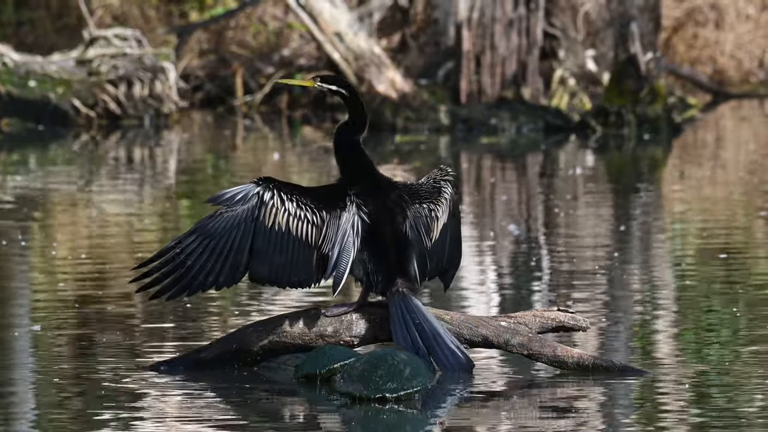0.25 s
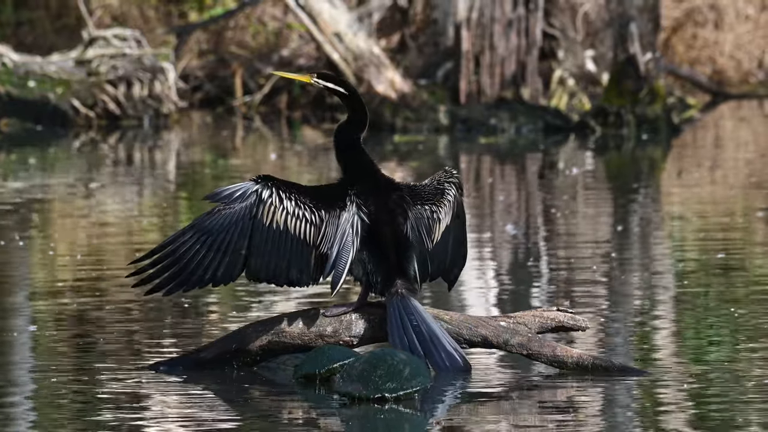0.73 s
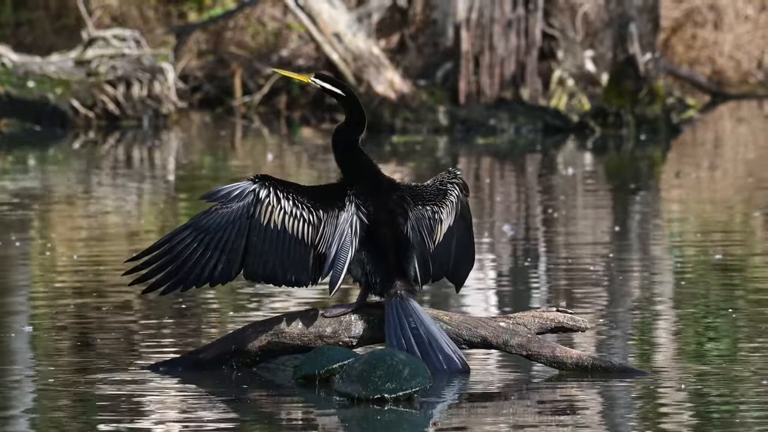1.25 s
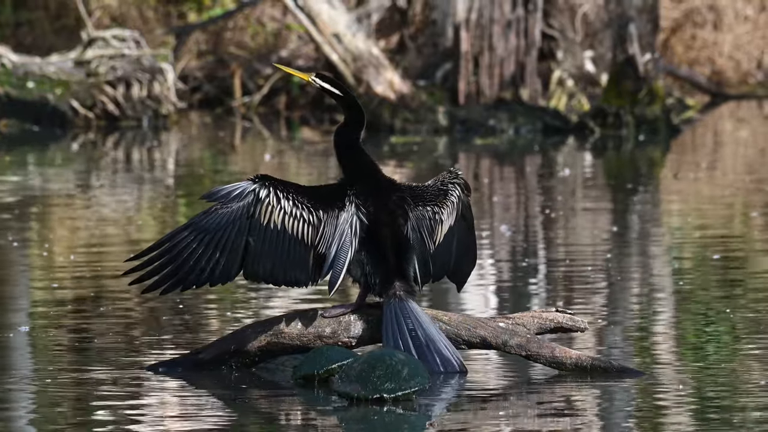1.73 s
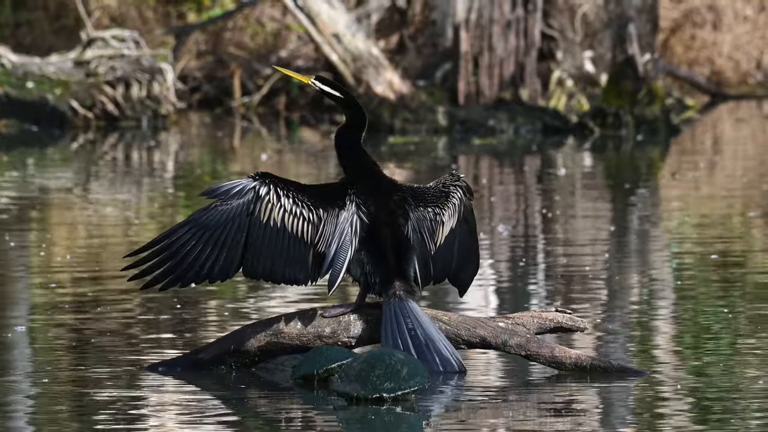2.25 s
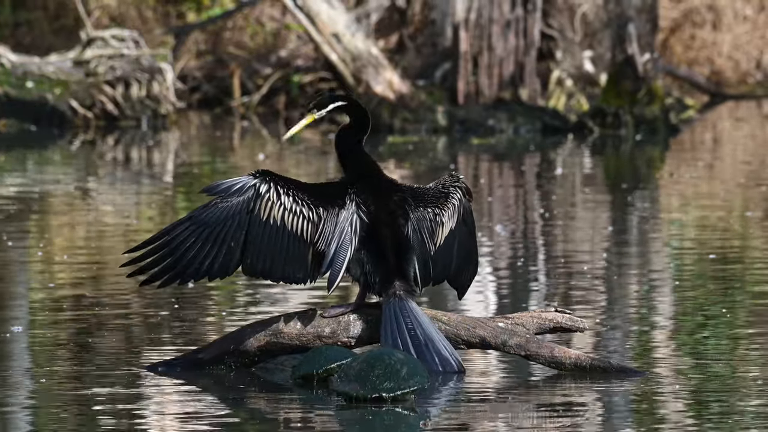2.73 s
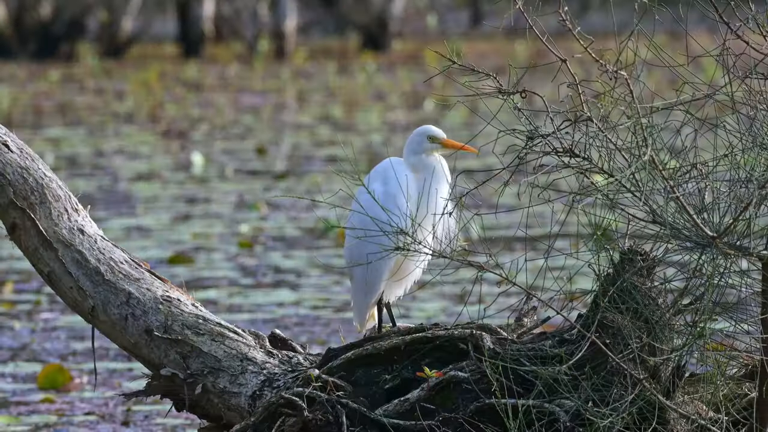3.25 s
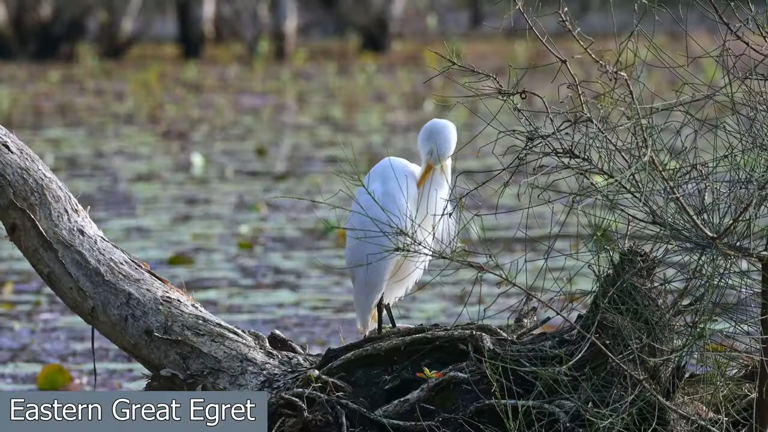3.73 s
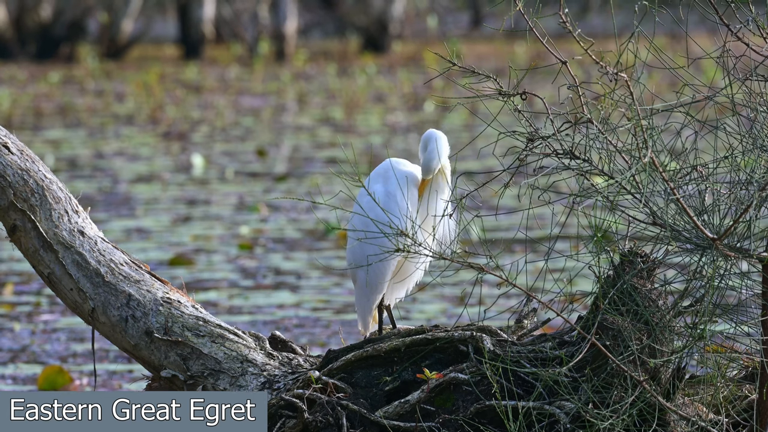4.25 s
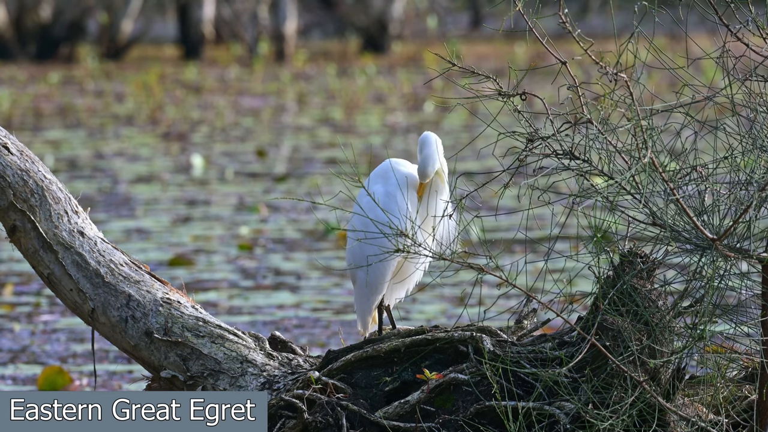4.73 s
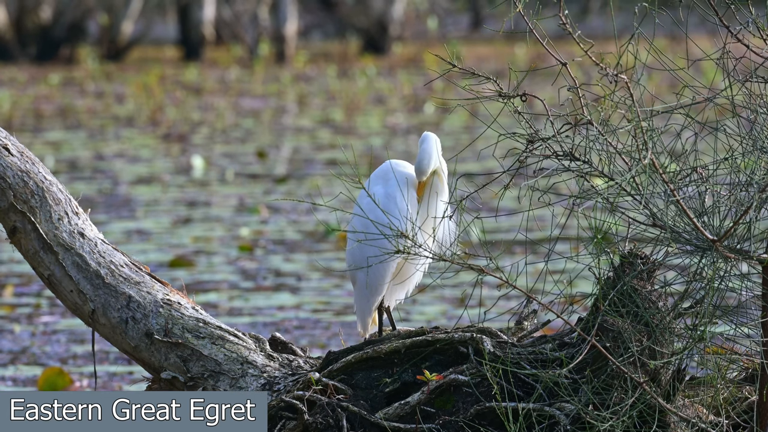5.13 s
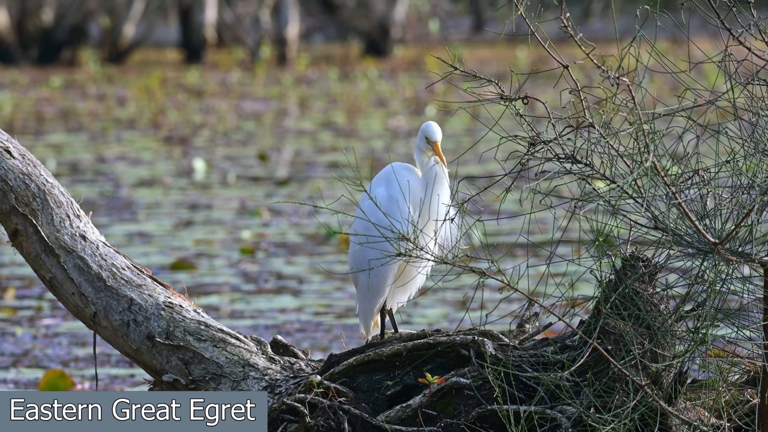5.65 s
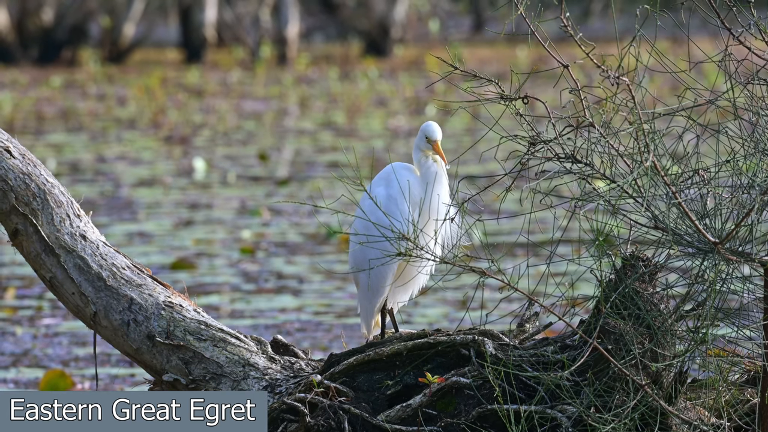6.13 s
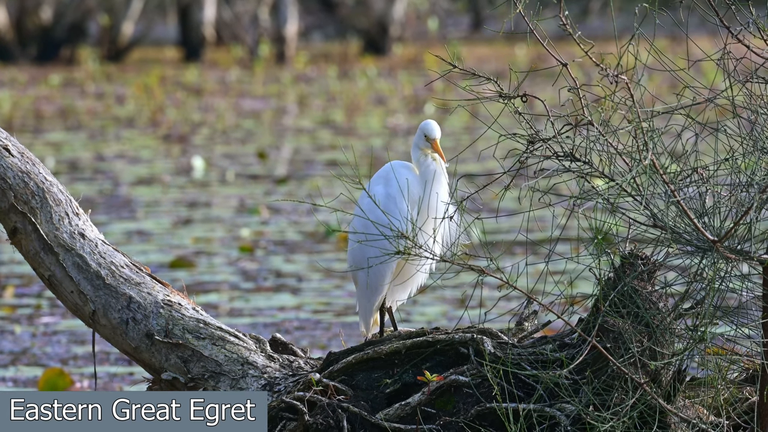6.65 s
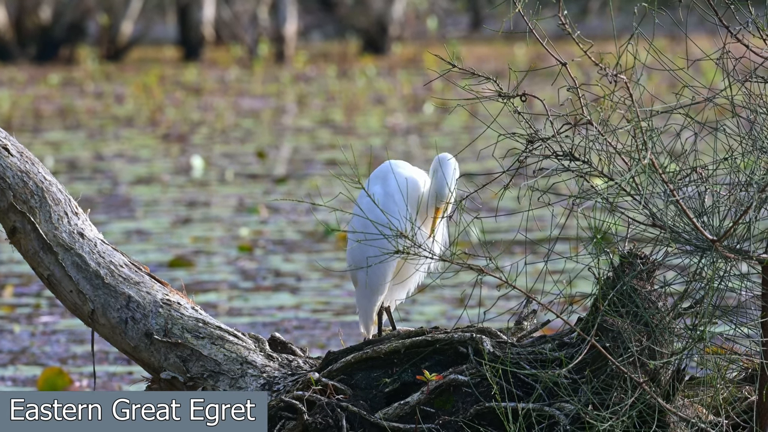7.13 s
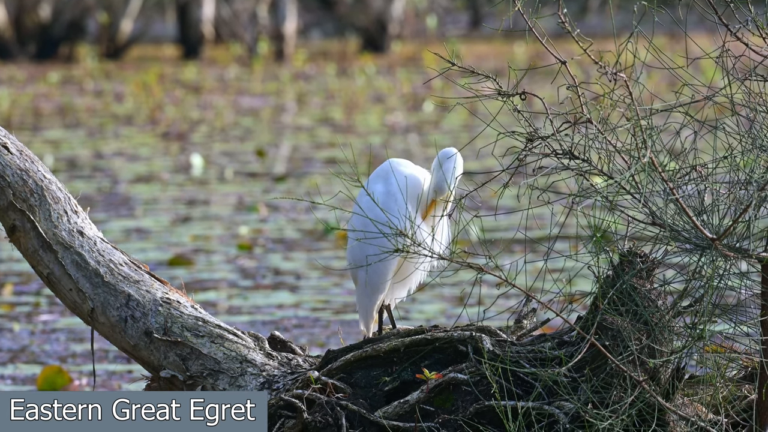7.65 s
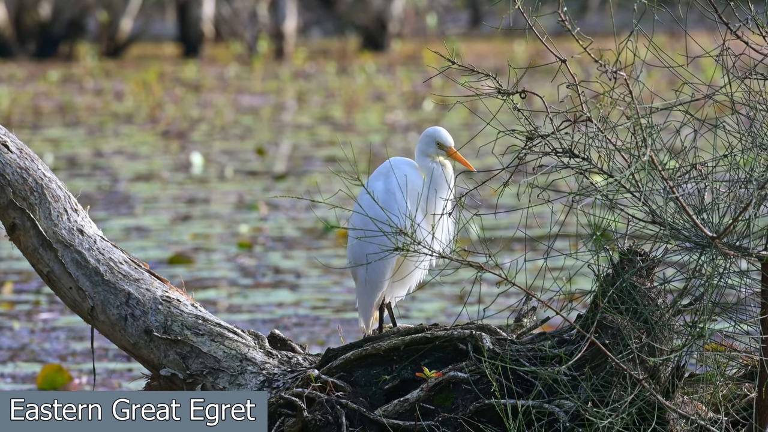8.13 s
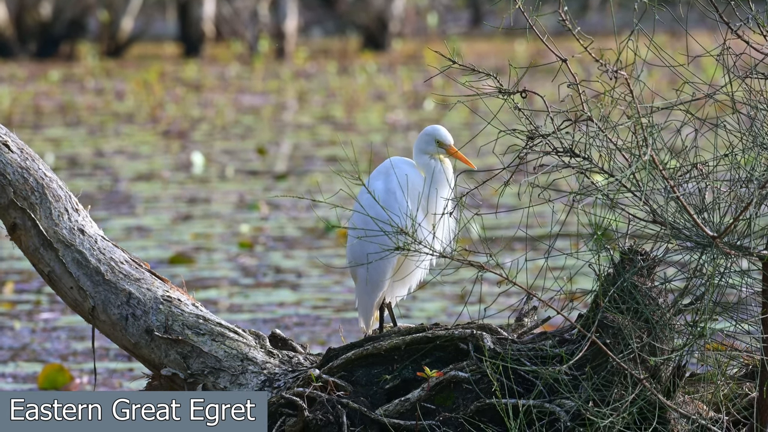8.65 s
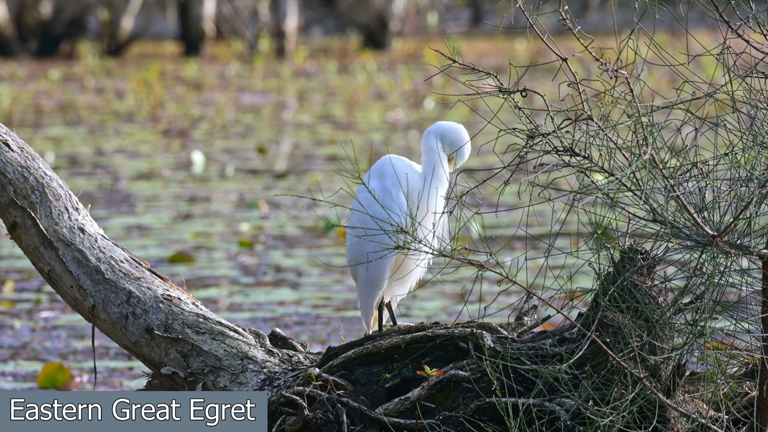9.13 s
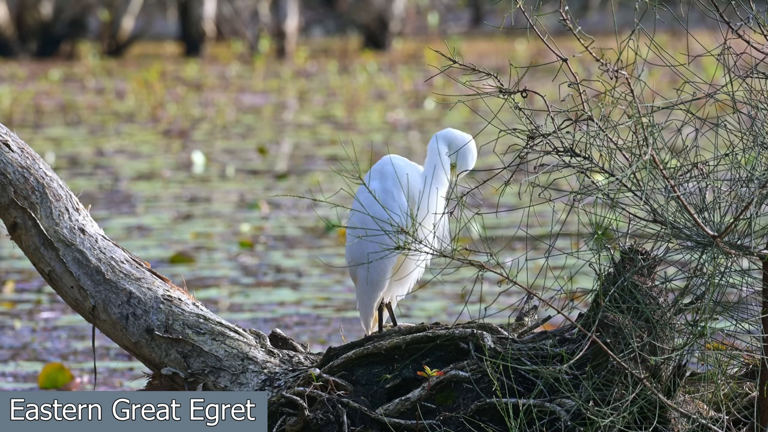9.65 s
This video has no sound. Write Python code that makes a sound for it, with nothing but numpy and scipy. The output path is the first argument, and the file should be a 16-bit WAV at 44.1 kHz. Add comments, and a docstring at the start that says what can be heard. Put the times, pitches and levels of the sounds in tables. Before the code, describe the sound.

A wooded wetland alive with small birds, heard in stereo with a short, soft echo from trees. From 0 to 1 second, raspy, scratchy calls mix with high whistles over a dense, blurred distant chorus and a low far rumble with faint hiss. A short buzzing note comes at about 1.2, bright bent whistles at 1.4, and brief throaty croaks near 1.5 and 2.7. Between 2.8 and 3.2 the rumble sinks to a much quieter bed. Quick squeaks, chirps and a fluted warble cluster at 3.1-3.9, then lively bursts at 4.2-4.7, 5.3, 5.8 and 6.2-6.6, with quieter gaps. Busy chirping resumes at 7-7.5; a fast, dry trill of about fourteen syllables per second runs from 7.5 to 9.1, weakening toward its end, with sharp whistles over it around 8-8.5. A low warble and faint rasp arrive near 9.1, then scattered thin whistles until 9.9.

```python
"""A wetland wood full of small birds. Close by are whistled notes with overtones, low fluted warbles,
a dry trill, steep squeaks, a buzz, rasps and two croaks. The whistles are gliding sines with overtones;
rasps and croaks are pulses ringing a throat. Behind them a chorus of many short glides is blurred
toward noise. Far rumble and hiss, made of coloured noise, sink after about three seconds."""
import sys
import numpy as np
from scipy import signal
from scipy.fft import rfft, irfft
from scipy.io import wavfile
from scipy.ndimage import uniform_filter1d

SR = 44100
rng = np.random.default_rng(int(sys.argv[2]) if len(sys.argv) > 2 else 0)


def persist_wave(psi):
    """Save psi, clipped to +-1, as 16-bit WAV."""
    counts = np.round(np.clip(psi, -1, 1) * 32767).astype(np.int16)
    wavfile.write(sys.argv[1], SR, np.atleast_2d(counts).T)


N = 435708   # length in samples

# Colour of the far rumble and hiss, early and late. Each row: frequency in Hz, relative dB per Hz.
EARLY_COLOUR = [(12, -36), (20, -11.5), (77, 2.5), (157, 1.5), (483, -8.5), (899, -7), (1140, -17.5),
                (1340, -11), (1610, -20.5), (2400, -27), (3120, -71), (5280, -120)]
LATE_COLOUR = [(12, -37), (20, -13), (75, -0.5), (255, -2), (330, -9.5), (396, -11), (693, -17),
               (782, -17.5), (1890, -25.5), (2400, -24.5), (3120, -52), (5280, -120)]
EARLY_DB, LATE_DB = -45.5, -58   # rms below 1 kHz
# Start and end, in seconds, of the fade from the early to the late background.
FADE_S = [2.8, 3.18]
# How alike the far noise is in both ears. Each row: frequency in Hz, likeness from 0 to 1.
EAR_LIKENESS = [(60, 1), (290, 0.97), (640, 0.81), (1410, 0.52), (3100, 0.12)]

# Swells of the blurred chorus. Each row: middle in seconds, half length in seconds,
# then the levels of low voices, high voices and overtones in dB.
CHORUS_SWELLS = [(0.0, 0.29, -38.5, -47.5, -86), (0.382, 0.22, -41.5, -47.5, -75),
                 (0.797, 0.2, -44, -52.5, -88), (1.455, 0.31, -42, -56.5, -87),
                 (1.725, 0.16, -50, -59, -84), (2.09, 0.22, -47, -66, -89), (2.517, 0.42, -53, -75, -92),
                 (2.78, 0.26, -46.5, -59.5, -86), (3.403, .15, -49.5, -47, -61.5),
                 (3.644, 0.086, -68, -57, -61), (3.8, 0.14, -60.5, -75, -87), (4.388, 0.18, -52, -68, -87),
                 (4.53, 0.17, -75, -66, -79), (4.975, 0.15, -56.5, -58.5, -75), (5.31, 0.15, -57, -66, -85),
                 (5.822, 0.12, -58, -53, -70.5), (6.278, 0.14, -55, -69, -71), (6.446, 0.18, -51, -53, -65),
                 (6.672, 0.22, -58, -49, -68.5), (7.02, 0.24, -54, -80, -84),
                 (7.197, 0.12, -56, -52.5, -74), (7.412, 0.18, -52, -69, -68), (7.99, 0.098, -53, -67, -71),
                 (8.368, 0.18, -45, -56, -63.5), (8.753, 0.36, -55, -72, -101.5),
                 (8.904, 0.13, -54, -50, -65.5), (9.16, .1, -47, -61, -64), (9.258, .11, -50.5, -52, -60),
                 (9.655, 0.043, -64, -51, -85), (9.88, 0.15, -49, -58, -68)]
# Steady murmur between swells, first row early, second late. Each row: low voices, high voices
# and overtones in dB.
MURMUR_LEVELS = [(-55.5, -81, -80), (-58.5, -65.5, -91)]
WOOD_T60_S, WOOD_DB, LEAF_CUT_HZ = 0.37, -10, 6500   # echo decay, echo level for near birds, dulling

# Croaks. Each row: start in seconds, length in seconds, level in dB before shaping and end fades.
CROAK_CALLS = [(1.476, .185, -37.5), (2.669, .17, -40.5)]
# Course of one croak. Each row: share of its length, pulses per second before drift, dB added.
CROAK_COURSE = [(0, 302., -1.5), (0.202, 312., -4.5), (.5, 308., -1), (0.752, 294., 0.5), (1, 272., -10)]
# Resonances of the croaking throat, for one of two passes. Each row: Hz, width in Hz, level in dB.
CROAK_THROAT = [(1450, 410, -3), (2500, 180, -21)]

# Rasping calls. Each row: start in seconds, end in seconds, pulses per second before drift,
# level in dB before end fades, depth of chopping from 0 to 1.
RASP_CALLS = [(0.045, 0.227, 64, -58, 0.22), (0.262, 0.522, 75., -52.5, 0.1),
              (0.648, 0.901, 70., -54.5, 0.5), (9.129, 9.31, 92, -61, 0.3)]
# Resonances of the rasping throat. Each row: frequency in Hz, width in Hz, level in dB.
RASP_RESONANCES = [(3900, 650, -7), (4860, 4000, -5), (6980, 150, -11), (2800, 600, 12)]

# Trill. Each row: onset in seconds, dB added to the syllable.
TRILL_SYLLABLES = [(7.5468, -34), (7.6294, -33), (7.7021, -32), (7.7746, -32.5), (7.8463, -32),
                   (7.9174, -34), (7.992, -34.5), (8.063, -34.5), (8.1336, -33.5), (8.2035, -35.5),
                   (8.2748, -31.5), (8.3516, -38), (8.424, -34.5), (8.4987, -33.5), (8.5738, -34),
                   (8.65, -36), (8.733, -35.5), (8.815, -44.5), (8.885, -45), (8.958, -50), (9.03, -49),
                   (9.1, -48)]
# One trill syllable. Each row: seconds after onset, pitch in Hz, relative dB.
SYLLABLE_SHAPE = [(-.009, 2748, -34), (-.003, 3208, -14.5), (.004, 3290, -10), (.009, 2700, -12),
                  (.016, 2262, -11.5)]

# Steep squeaks. Each row: time of the highest pitch in seconds, dB added to the arch.
SQUEAK_TOPS = [(2.107, -57.5), (3.054, -66.5), (3.165, -64.5), (3.291, -60), (3.462, -61.5), (3.645, -63.5),
               (3.84, -78), (4.08, -72.5), (4.429, -62), (4.699, -70), (5.277, -73), (7.373, -74),
               (8.01, -64.5), (8.268, -58), (9.656, -73)]
# Rise and fall of one squeak. Each row: seconds from the top, pitch in Hz before scaling, relative dB.
SQUEAK_ARCH = [(-.025, 2180, -44), (-.012, 2945, 8), (-.003, 3900, -14.5), (.008, 3500, 5.5),
               (.017, 2525, 5.5), (.045, 2500, -18)]
# Partials 2 to 5 of a squeak, in dB against the fundamental, before any dulling.
SQUEAK_PARTIALS = [7, -19, -21.5, -14]

# Buzzing note. Each row: time in seconds, pitch in Hz, level in dB before the throb.
BUZZ_NOTE = [(1.195, 1965, -50.5), (1.24, 2114, -46), (1.3, 2126, -43), (1.38, 2176, -43.5),
             (1.425, 2000, -57)]
BUZZ_PER_S = 118.   # throbs per second
# Partials 2 to 5 of the buzz, in dB against the fundamental.
BUZZ_PARTIALS = [-6.5, -18.5, -27.5, -49]

# Low, nearly pure warbles and sweeps. Each row: time in seconds, pitch in Hz, dB before flutter.
FLUTED_WARBLES = [
    [(0.07, 2170, -57), (0.22, 2340, -54), (0.241, 2810, -45.5)],
    [(3.545, 1450, -66), (3.585, 1886, -50), (3.61, 1810, -45.5), (3.635, 1417, -51.5), (3.655, 1588, -43),
     (3.675, 2050, -46.5), (3.7, 2060, -46)],
    [(3.845, 1997, -52.5), (3.865, 3410, -45), (3.88, 2890, -57)],
    [(4.29, 2130, -57), (4.33, 1900, -64), (4.36, 2170, -51)],
    [(4.54, 2100, -52), (4.57, 1870, -70), (4.6, 1784, -58)],
    [(4.683, 2760, -41), (4.692, 3040, -47.5), (4.715, 2020, -48.5)],
    [(6.255, 2186, -62), (6.27, 1936, -66), (6.3, 2290, -58)],
    [(7.318, 2013, -50.5), (7.335, 1672, -44), (7.355, 1875, -49.5), (7.385, 1455, -51)],
    [(7.448, 3040, -52), (7.456, 2306, -54), (7.472, 2580, -49), (7.484, 2400, -54)],
    [(8.965, 1505, -56.5), (8.985, 2083, -55), (9.01, 1912, -46), (9.04, 1393, -63), (9.075, 1500, -48.5),
     (9.125, 2185, -41.5), (9.16, 1560, -45)],
]
# Partials 2 to 4 of the warbles, in dB against the fundamental.
FLUTED_PARTIALS = [-20.5, -43, -34]

# Single whistled notes. Each row: start in seconds, length in seconds, first pitch in Hz,
# last pitch in Hz, level of the strongest partial in dB before flutter.
WHISTLED_NOTES = [ (0.002, 0.045, 5380, 4930, -45), (0.025, 0.16, 2734, 3020, -54),
                  (0.046, 0.14, 3270, 3390, -44), (0.263, 0.04, 3700, 3940, -47),
                  (0.269, 0.16, 2704, 2836, -51.5), (0.379, 0.049, 4100, 4000, -50),
                  (0.52, .02, 3670, 4100, -58), (0.543, .025, 3950, 3580, -58),
                  (0.648, 0.24, 1830, 2000, -52.5), (0.655, 0.082, 3580, 3790, -48.5),
                  (0.89, 0.067, 5100, 4950, -60), (1.359, .05, 3050, 2800, -53),
                  (1.515, 0.037, 3750, 3620, -56), (1.541, 0.087, 3245, 3283, -50),
                  (1.997, .02, 4050, 4040, -54), (2.05, 0.026, 3950, 4040, -52),
                  (2.076, .19, 2740, 2847, -52), (2.278, 0.044, 2726, 2820, -57.5),
                  (2.402, 0.076, 2780, 2710, -59), (2.403, 0.071, 3300, 4430, -61),
                  (2.463, 0.051, 2740, 3060, -53), (2.735, .13, 2940, 3210, -49),
                  (2.897, 0.075, 5050, 4970, -64), (3.284, .018, 1180, 1510, -55),
                  (3.296, .018, 7430, 6700, -54), (3.302, .034, 1510, 1573, -54),
                  (3.342, .014, 2610, 2490, -52), (3.351, .048, 1312, 1427, -51),
                  (3.406, .02, 4150, 4330, -43), (3.426, .03, 4300, 4450, -40),
                  (3.46, .018, 3550, 3730, -50), (3.468, .02, 7500, 6600, -52),
                  (4.211, 0.043, 4160, 4390, -56.5), (4.253, 0.042, 4430, 4200, -55.5),
                  (4.33, 0.029, 3460, 4640, -49), (4.363, 0.022, 3710, 3820, -54),
                  (4.367, 0.059, 2662, 2690, -45.5), (4.439, 0.017, 3100, 2070, -51),
                  (4.74, .025, 4350, 4000, -65), (5.223, 0.044, 2290, 1980, -60),
                  (5.259, 0.013, 1340, 1320, -51), (5.269, 0.0077, 2900, 3420, -50),
                  (5.274, 0.033, 3850, 4030, -43.5), (5.321, 0.015, 2800, 2920, -48.5),
                  (5.389, .016, 3560, 3560, -50), (5.46, 0.0085, 5900, 5850, -55.5),
                  (5.737, 0.066, 2850, 3016, -58), (5.769, 0.027, 2800, 3020, -63),
                  (5.803, .045, 2580, 3260, -63), (5.806, 0.021, 4630, 4330, -49),
                  (6.095, 0.078, 1333, 1335, -54.5), (6.168, 0.012, 2350, 2660, -53),
                  (6.234, 0.025, 4700, 4330, -60), (6.311, .058, 2510, 2660, -54),
                  (6.291, 0.013, 2027, 2030, -55), (6.368, .012, 2460, 2530, -44.5),
                  (6.383, .012, 2900, 2870, -45), (6.393, 0.064, 3030, 3190, -48),
                  (6.445, .044, 3250, 3540, -44.5), (6.475, 0.025, 4080, 4300, -50.5),
                  (6.49, .035, 3400, 2720, -59.5), (6.525, 0.036, 3870, 4210, -52.5),
                  (6.553, 0.018, 4060, 4360, -60), (6.565, 0.02, 4580, 4230, -47.5),
                  (6.578, 0.064, 4430, 4440, -60), (6.58, 0.056, 3530, 3370, -53.5),
                  (6.901, 0.068, 2374, 2510, -64.5), (6.986, 0.024, 3370, 3500, -57.5),
                  (7.004, .026, 3340, 4020, -53), (7.028, 0.031, 4260, 4100, -51.5),
                  (7.101, .05, 2734, 2380, -54.5), (7.145, 0.026, 2390, 2800, -60),
                  (7.354, 0.015, 1340, 1400, -57), (7.368, .006, 2880, 3580, -47),
                  (7.374, 0.03, 3770, 4060, -44.5), (7.404, .021, 3120, 3140, -46),
                  (7.422, 0.011, 2900, 2950, -48), (7.429, .02, 4500, 4500, -53),
                  (7.436, .018, 3900, 4135, -41.5), (7.451, 0.034, 4394, 4304, -40),
                  (7.485, 0.013, 3600, 3720, -46.5), (7.7, 0.073, 5920, 5860, -69),
                  (7.814, 0.028, 3360, 3900, -65), (7.976, 0.022, 3700, 3710, -50),
                  (8, 0.048, 4080, 4225, -48), (8.222, 0.057, 1367, 1585, -52.5),
                  (8.236, 0.028, 3620, 3740, -48.5), (8.297, .06, 1520, 1503, -56.5),
                  (8.3, 0.018, 3720, 4060, -52), (8.312, 0.014, 2970, 3010, -50),
                  (8.333, 0.018, 3150, 2970, -45), (8.348, 0.021, 4050, 3980, -43),
                  (8.365, 0.022, 3250, 2980, -50), (8.387, 0.012, 2800, 2800, -44.5),
                  (8.399, .026, 3100, 3240, -47), (8.454, 0.0095, 3470, 3180, -45),
                  (8.46, 0.023, 3160, 3395, -46), (8.429, 0.026, 4265, 4110, -39.5),
                  (8.852, 0.028, 2760, 3090, -55.5), (8.92, 0.023, 3130, 3330, -58.5),
                  (8.941, 0.057, 4060, 4710, -56.5), (8.988, 0.042, 4610, 4450, -53.5),
                  (9.018, .023, 3370, 3600, -54.5), (9.403, 0.083, 4000, 4030, -61),
                  (9.634, 0.012, 6500, 5670, -48.5), (9.735, 0.075, 3660, 4000, -56),
                  (9.822, 0.052, 4250, 4530, -52)]
# Whistles whose pitch or strength bends several times. Each row: time in seconds, pitch in Hz,
# level of the strongest partial in dB before flutter.
BENT_WHISTLES = [
    [(1.026, 3700, -51), (1.046, 4230, -46.5), (1.085, 4390, -53), (1.103, 4250, -42.5),
     (1.108, 3400, -50.5), (1.165, 3900, -48.5), (1.185, 3970, -55)],
    [(1.398, 3750, -51), (1.415, 4150, -36.5), (1.43, 4120, -39), (1.44, 3600, -44), (1.46, 3600, -49),
     (1.472, 4270, -44), (1.488, 4260, -44.5), (1.495, 3900, -42)],
    [(4.427, 2540, -38.5), (4.437, 2610, -44.5), (4.443, 2940, -45.5), (4.454, 3040, -39.5),
     (4.458, 3330, -41)],
    [(4.462, 3226, -47), (4.495, 3240, -46.5), (4.52, 3660, -43), (4.55, 3540, -64)],
    [(5.301, 3120, -47), (5.317, 3035, -46), (5.322, 3400, -29)],
    [(5.336, 3880, -41.5), (5.346, 3900, -44), (5.357, 4430, -40.5), (5.38, 4370, -41.5), (5.39, 4130, -41)],
    [(9.19, 1006, -62), (9.25, 1165, -56), (9.295, 1094, -56.5)],
    [(6.185, 3350, -51), (6.205, 3880, -47.5), (6.228, 4505, -42), (6.248, 4410, -41), (6.256, 3670, -42.5),
     (6.272, 3450, -67)],
    [(7.17, 3200, -48), (7.186, 3510, -62), (7.22, 3540, -50), (7.226, 3250, -54), (7.25, 3485, -48),
     (7.303, 3450, -76)],
]
# Windpipe and beak colour each partial by its frequency. Each row: frequency in Hz, relative dB.
BEAK_COLOUR = [(1100, -10), (1400, -10.5), (2000, -2.5), (2700, 2), (4000, 5), (5500, 0), (6600, -4),
               (7400, -9), (8300, -13), (10500, -22), (13000, -28), (18000, -16)]
# How wide the beaks open. Each row: time in seconds, dB added to every overtone.
BEAK_GAPE = [(0.0, -1.5), (0.3, 0.5), (0.75, 5), (1.1, -6), (1.6, 0.5), (2.2, -0.5), (2.8, 0.5),
             (3.33, -3.5), (3.45, -2.5), (4.25, -7), (4.4, -9.5), (4.44, 11), (4.49, 9.5), (4.6, -8),
             (5.3, 0), (5.8, 12), (6.13, 1.5), (6.23, -7.5), (6.4, 6), (6.55, 2), (7.1, 2.5), (7.42, 4),
             (8.0, -2), (8.35, 1.5), (8.9, 15), (9.25, 4), (9.45, -8), (9.8, -5)]
# Where the whistles come from. Each row: time in seconds, left over right in dB,
# lag of the left ear in microseconds.
PERCHES = [(0.0, 2, -19), (0.19, -2.5, 40), (0.95, -4.5, 20), (1.07, 3, -60), (1.3, -2, 35),
           (1.45, 0.5, -28), (2.1, -4.5, -1), (2.8, 2.5, -34), (3.3, -5.5, 95), (4.25, -9.5, 105.5),
           (4.5, -3.5, 65), (5.3, 0, 20), (5.8, -2, 40), (6.25, 3, -13), (6.45, 0, 40), (6.6, -6, -20),
           (7.05, 5, 50), (7.2, -8, 100), (7.42, 5.5, -38), (8.0, 4, -70), (8.35, -1, 55),
           (8.95, -12.5, 20), (9.5, 14, -90), (9.88, 1, -90)]
# Hoarseness of the singers in turn. Each row: time in seconds, breath in dB against the tone.
HOARSENESS = [(0, -19), (.6, -5), (.9, -11), (1.0, -36), (3, -35), (9.88, -19.5)]
HALO_HZ = 660   # how far the breath noise spreads to each side of a partial
GLIDE_AT_HALF, EDGE_DB = .62, -2   # share of the glide done by mid-note; level of both ends
DULL_HZ, DULL_DB = 7300, -19   # early whistles are weaker above this frequency


def from_db(db):
    """Decibels to gain."""
    return 10 ** (np.asarray(db) / 20)


def rms_one(x):
    """Scale to unit rms."""
    return x / np.sqrt(np.mean(x ** 2) + 1e-20)


def drift(rate, size=N):
    """Slow chance: random points of spread 1, rate per second, joined by straight lines."""
    points = rng.standard_normal(int(N * 1000 / SR) + 9)
    return np.interp(np.arange(size) * rate / SR, np.arange(len(points)), points)


def over_log_hz(hz, table):
    """Read a table of frequency and value along a logarithmic frequency scale."""
    table_hz, values = np.transpose(table)
    return np.interp(np.log(hz), np.log(table_hz), values)


def band(x, low_hz, high_hz):
    """Steep band-pass."""
    return signal.sosfilt(signal.butter(6, [low_hz, high_hz], "band", fs=SR, output="sos"), x)


def low_noise(cut_hz, shape):
    """White noise with the treble above cut_hz rolled off."""
    return signal.lfilter(*signal.butter(2, cut_hz, fs=SR), rng.standard_normal(shape))


def resonate(x, modes):
    """A throat as parallel resonances of alternating sign."""
    out = 0
    for k, (hz, width, db) in enumerate(modes):
        r = np.exp(-np.pi * width / SR)
        poles = [1, -2 * r * np.cos(2 * np.pi * hz / SR), r * r]
        ringing = signal.lfilter([1, 0, -1], poles, x) * (1 - r * r)
        out = out + (-1) ** k * from_db(db) * ringing
    return out


def pulses(per_s, jitter_db):
    """One click per cycle, uneven in size."""
    cycle = np.floor(np.cumsum(per_s) / SR)
    return np.diff(cycle, prepend=0) * from_db(jitter_db * rng.standard_normal(len(per_s)))


def add(out, sound, s, pan_db, lag_us):
    """Place a sound between the ears, with a level difference and a lag of the left ear."""
    lag = round(lag_us * SR / 10 ** 6)
    for ear, side in enumerate((1, -1)):
        at = round(s * SR) + (lag if ear == 0 else 0)
        part = sound[max(0, -at):max(0, N - at)]
        out[ear, max(at, 0):max(at, 0) + len(part)] += part * from_db(side * pan_db / 2)


def whistle(rows, partials_db, flutter, waver):
    """A syrinx tone: gliding sine with overtones, varied by flutter and waver, soft at both ends."""
    s, hz, db = np.transpose(rows)
    t = np.arange(s[0] - .004, s[-1] + 0.00094, 1 / SR)
    at = (np.abs(t) * SR).astype(int) % N
    pitch = uniform_filter1d(np.interp(t, s, hz), size=200) * waver[at]
    phase = 2 * np.pi * np.cumsum(pitch) / SR
    tone = np.sin(phase)
    higher_db = partials_db[-1] - 26.5 - 3.7 * np.arange(5)   # five more, ever weaker
    for k, partial_db in enumerate([*partials_db, *higher_db], 2):
        below_limit = np.clip((SR / 2.4 - k * pitch) / 2000, 0, 1)   # avoids aliasing
        tone += from_db(partial_db) * np.sin(k * phase + k) * below_limit
    ends = np.clip(np.minimum(t - t[0], t[-1] - t) / .008, 0, 1)
    level = from_db(np.interp(t, s, db))
    return np.sqrt(2) * tone * ends * level * flutter[at], t[0]


def far_noise(spectrum, db):
    """Far rumble and hiss: noise of a given colour, most alike in both ears in the bass."""
    hz = np.fft.rfftfreq(N, 1 / SR) + 1
    colour = from_db(over_log_hz(hz, np.add(spectrum, [1, 0])))
    alike = np.clip(over_log_hz(hz, EAR_LIKENESS), 0, 1)
    mid, side = rfft(rng.standard_normal((2, N)))
    ears = np.sqrt(1 + alike) * mid + np.sqrt(1 - alike) * side * [[1], [-1]]
    ears = colour * ears / np.sqrt(2)
    return irfft(ears, N) * from_db(db) / np.sqrt(np.mean(colour ** 2 * (hz < 1000)))


def wood(x):
    """Scatter from trunks: a decaying noise tail of its own per ear, dulled by leaves."""
    t = np.arange(SR) / SR
    decay = from_db(-60 * t / WOOD_T60_S) * np.clip(t / 0.002, 0, 1)
    tail = rng.standard_normal((2, SR)) * decay
    tail = signal.lfilter(*signal.butter(1, LEAF_CUT_HZ, fs=SR), tail)
    tail /= np.sqrt(np.sum(tail ** 2, axis=1, keepdims=True))
    return signal.fftconvolve(x, tail, axes=1)[:, :N]


def chorus_gains():
    """Gain of low voices, high voices and overtones: a murmur plus swells, added as power."""
    t = np.arange(0, N, 64) / SR
    late_share = np.interp(t, FADE_S, [0, 1])
    early, late = np.array(MURMUR_LEVELS)[:, :, None]
    power = from_db(2 * (early + late_share * (late - early)))
    for s, half, *levels_db in CHORUS_SWELLS:
        swell = np.exp(-4. * ((t - s) / half) ** 2)
        power += from_db(2 * np.array(levels_db))[:, None] * swell
    return [np.interp(np.arange(N) / SR, t, np.sqrt(p)) for p in power]


def far_chorus():
    """Hundreds of short glides with overtones overlap; distance blurs them toward noise."""
    out, steady = np.zeros((2, N)), np.ones(N)
    flutter = from_db(4.6 * drift(200))
    for u in rng.random((500, 6)):
        s, length, hz = u[0] * N / SR, .03 + .12 * u[1], 2400 * 2 ** (1.3 * u[2])
        middle = (s + length / 2, hz * (1 + .15 * u[3]), 0)
        rows = [(s, hz, -6), middle, (s + length, hz * (1.1 + .35 * u[4]), -6)]
        voice = whistle(rows, [-3., -10., -16.], flutter, steady)
        add(out, *voice, 9.5 * (u[5] - .6), 600. * (u[5] - .5))
    hiss = low_noise(5000, (2, N))
    ragged = out * (.4 + drift(900))
    blurred = rms_one(ragged + 2.0 * wood(out)) + 1.1 * hiss
    edges_hz = [(2300, 5030), (4800, 7330), (7600, 19000)]   # low voices, high voices, overtones
    return sum(rms_one(band(blurred, *edge)) * gain for edge, gain in zip(edges_hz, chorus_gains()))


def croaks():
    """Fast pulse trains that slow at the end, ringing a throat."""
    out = np.zeros((2, N))
    share, per_s, shape_db = np.transpose(CROAK_COURSE)
    for start, length, db in CROAK_CALLS:
        t = np.arange(0, length, 1 / SR) / length
        rate = np.interp(t, share, per_s) * (1 + .02 * drift(120, size=len(t)))
        voice = resonate(resonate(pulses(rate, 1.7), CROAK_THROAT), CROAK_THROAT)
        level = from_db(db + np.interp(t, share, shape_db)) * signal.windows.tukey(len(t), .3)
        add(out, rms_one(voice) * level, start, -2.5, 100.)
    return out


def rasps(notes):
    """Slow ragged pulses chop the notes sung meanwhile and let bursts of breath ring the throat."""
    out, chop = np.zeros((2, N)), np.ones(N)
    for start, end, per_s, db, depth in RASP_CALLS:
        size, at = round((end - start) * SR), round(start * SR)
        clicks = pulses(per_s * from_db(1.5 * drift(40, size=size)), 1.5)
        gate = signal.lfilter([1], [1, -.97], clicks)   # each click becomes a soft burst
        gate = rms_one(signal.lfilter([1], [1, -.994], gate))
        chop[at:at + size] = 1 + depth * (np.minimum(gate, 2) - 1)
        voice = band(resonate(gate * rng.standard_normal(size), RASP_RESONANCES), 1870, 8400)
        level = from_db(db) * signal.windows.tukey(size, .3)
        add(out, rms_one(voice) * level, start, -1.5, 60.)
    return out + notes * chop


def add_trill(out, flutter, waver):
    """A dry trill: one short syllable, nearly a pure tone, repeated fast."""
    for s, db in TRILL_SYLLABLES:
        rows = np.add(SYLLABLE_SHAPE, [s, 0, db])
        add(out, *whistle(rows, [-45], flutter ** 0.43, waver), -2.5, 50.)


def add_squeaks(out, flutter, waver, breath):
    """Steep squeaks: the pitch shoots up and falls while breath noise roughens the strength."""
    hoarse = flutter * (0.12 + 0.38 * breath)
    for (s, db), own_pitch in zip(SQUEAK_TOPS, rng.normal(1, 0.041, len(SQUEAK_TOPS))):
        rows = np.multiply(SQUEAK_ARCH, [1, own_pitch, 1]) + [s, 0, db]
        dulling = DULL_DB * (np.arange(4) > 0) * (s < FADE_S[0])   # early: partials 3 and up
        add(out, *whistle(rows, SQUEAK_PARTIALS + dulling, hoarse, waver), -1., 0)


def add_buzz(out, waver):
    """A buzzing note: a fast throb in strength puts sidebands round each partial."""
    throb = 1 + 0.86 * np.sin(2 * np.pi * BUZZ_PER_S * np.arange(N) / SR)
    add(out, *whistle(BUZZ_NOTE, BUZZ_PARTIALS, throb, waver ** 0.72), -3., 140.)


def add_fluted(out, flutter, waver):
    """Low fluted warbles and sweeps: whistles with weak overtones, from one spot."""
    for rows in FLUTED_WARBLES:
        add(out, *whistle(rows, FLUTED_PARTIALS, flutter, waver), -2, 125.)


def sung_note(start, length, from_hz, to_hz, db):
    """Rows of one note: a glide that slows, softer at both ends."""
    hz = from_hz + (to_hz - from_hz) * np.array([0, GLIDE_AT_HALF, 1])
    s = start + length * np.array([0, .5, 1])
    return np.transpose([s, hz, db + EDGE_DB * np.array([1, 0, 1])])


def through_beak(rows):
    """Windpipe and beak set partials 2-8; rows are lowered to the level of the fundamental."""
    s, pitch_hz, _ = np.mean(rows, axis=0)
    hz = pitch_hz * np.arange(1, 9)
    db = over_log_hz(hz, BEAK_COLOUR)
    db += DULL_DB * (hz > DULL_HZ) * (s < FADE_S[0])
    db[1:] += np.interp(s, *np.transpose(BEAK_GAPE))
    return np.subtract(rows, [0, 0, db.max() - db[0]]), db[1:] - db[0]


def add_whistled_notes(out, flutter, waver):
    """Single notes and bent whistles: syrinx tones coloured by the beak, each from its perch."""
    s, pans_db, lags_us = np.transpose(PERCHES)
    for rows in [sung_note(*note) for note in WHISTLED_NOTES] + BENT_WHISTLES:
        at = np.mean(rows, axis=0)[0]
        voice = whistle(*through_beak(rows), flutter, waver)
        add(out, *voice, np.interp(at, s, pans_db), np.interp(at, s, lags_us))


def near_birds():
    """All near whistles; breath smears a halo round the partials of notes, warbles and buzz."""
    out = np.zeros((2, N))
    flutter = from_db(2.0 * drift(150) + 5.0)   # unsteady strength
    waver = 1 + 0.01 * drift(250)   # unsteady pitch
    add_whistled_notes(out, flutter, waver)
    add_fluted(out, flutter, waver)
    add_buzz(out, waver)
    breath = rms_one(low_noise(HALO_HZ, N))
    rough = from_db(np.interp(np.arange(N) / SR, *np.transpose(HOARSENESS)))
    out = out * (1 + rough * breath)
    add_squeaks(out, flutter, waver, breath)
    add_trill(out, flutter, waver)
    return out


def scene():
    """Near birds in the wood, the chorus behind, one background fading into the other."""
    late_share = np.interp(np.arange(N) / SR, FADE_S, [0, 1])
    background = (1 - late_share) * far_noise(EARLY_COLOUR, EARLY_DB)
    background = background + late_share * far_noise(LATE_COLOUR, LATE_DB)
    near = rasps(near_birds()) + croaks()
    return near + from_db(WOOD_DB) * wood(near) + far_chorus() + background


def band_limit(x):
    """A steep low-pass at the top of the band."""
    return signal.sosfilt(signal.butter(12, 15710, fs=SR, output="sos"), x)


def record(dry):
    """Pass the finished mix on to its last step."""
    return band_limit(dry)


dry = scene()
out = record(dry)
persist_wave(out)
```